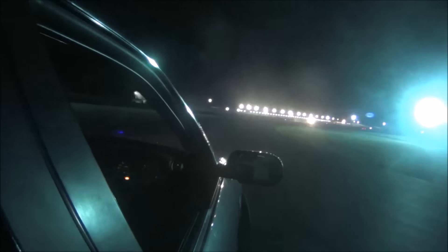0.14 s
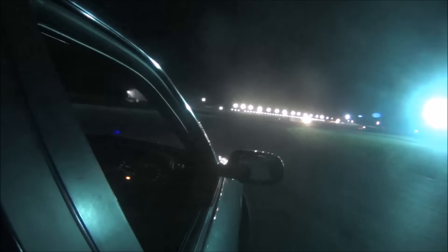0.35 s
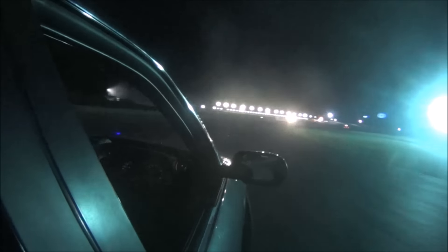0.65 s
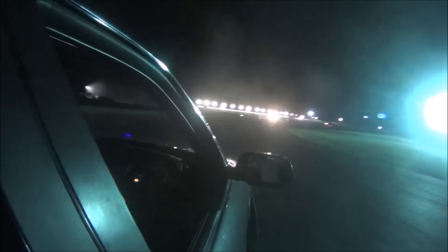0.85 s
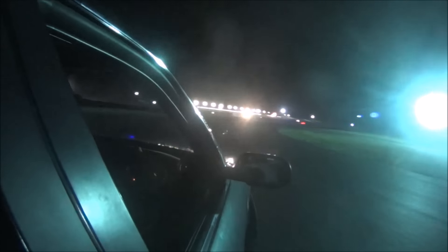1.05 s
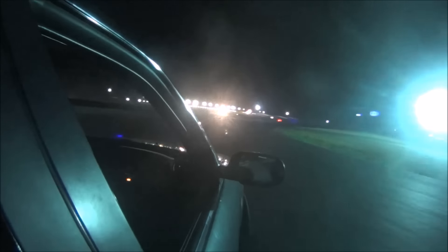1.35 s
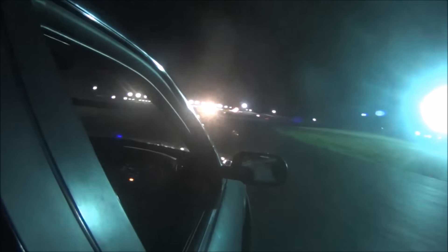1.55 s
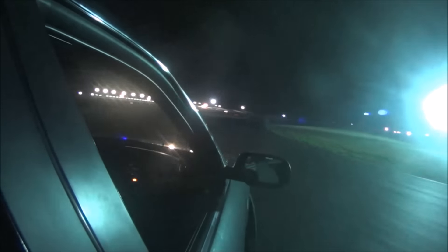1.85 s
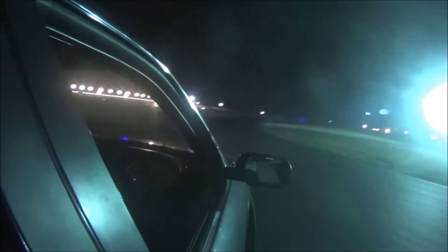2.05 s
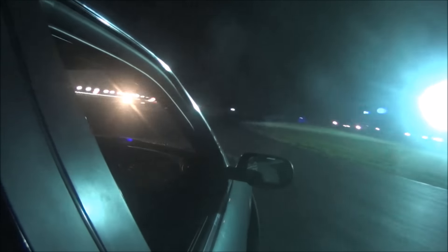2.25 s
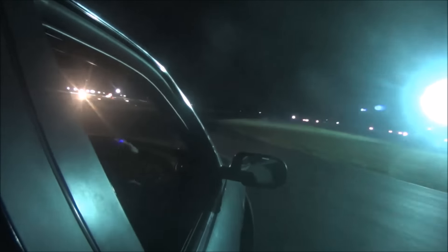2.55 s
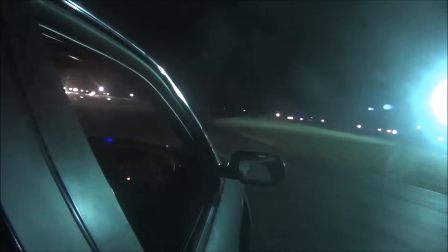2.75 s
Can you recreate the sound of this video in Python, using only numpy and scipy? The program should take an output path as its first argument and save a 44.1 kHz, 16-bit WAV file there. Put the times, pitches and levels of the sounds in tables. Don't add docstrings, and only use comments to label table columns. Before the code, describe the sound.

Car drifting on an open night track: loud limiter-bound exhaust stutters with low pops about eight times a second, over continuous wavering tire squeal and hissing rubber, with wind buffeting a camera microphone fixed to the car.

```python
import sys
import numpy as np
from scipy import signal
from scipy.fft import rfft, irfft
from scipy.io import wavfile
from scipy.ndimage import uniform_filter1d

SR = 44100
rng = np.random.default_rng(int(sys.argv[2]) if len(sys.argv) > 2 else 0)


def master(y):
    cut = np.clip(np.atleast_2d(y).T, -1, 1)
    pcm = np.round(cut * 32767)
    wavfile.write(sys.argv[1], SR, pcm.astype(np.int16))


def linear_from_db(decibels):
    return 10 ** (np.asarray(decibels, float) / 20)


N = 128331


def engine(t):
    mute_db, sag = ignition_cuts(t)
    return drone(t, mute_db, sag) + thumps(t) + 0.79 * pipe_hums(t) + boom(t, mute_db)


# [t/s, length/s, drop level/dB, thump level/dB, thump f/Hz]
CUTS = [(0.149, 0.016, -21, -16.5, 162), (.306, 0.036, -15.5, -16.5, 156), (0.447, 0.0062, -13.5, -24, 168),
        (0.589, 0.022, -25.5, -15.5, 162), (0.726, 0.0059, -14, -21, 204), (.85, 0.027, -7, -22, 126),
        (1.03, 0.067, -4.5, -16.5, 143), (1.211, 0.034, -11.5, -16.5, 145), (1.354, 0.024, -15, -18, 146.3),
        (1.478, 0.027, -12, -19.5, 165), (1.514, 0.011, -8, -29.5, 152), (1.618, 0.015, -14, -17.5, 167),
        (1.712, 0.023, -10, -15.5, 166), (1.81, 0.022, -6, -33, 214), (1.922, 0.021, -14, -23, 141),
        (1.982, 0.032, -10.5, -19, 130), (2.062, 0.035, -13.5, -18.5, 142.4),
        (2.138, 0.025, -7.5, -16, 148), (2.212, 0.023, -17, -15.5, 141), (2.299, 0.016, -5.5, -25.5, 130),
        (2.512, 0.027, -13, -16, 173), (2.576, 0.026, -11, -20, 137.4), (2.724, 0.016, -12.5, -13.5, 200),
        (2.846, 0.028, -19.5, -18, 133)]
REGAIN_S = 0.028


def ignition_cuts(t):
    at, length, drop_db = np.array(CUTS).T[:3, :, None]
    since = t - at
    mute_db = (drop_db * np.exp(-(2 * since / length) ** 2)).sum(0)
    recovery = np.exp(-np.maximum(since - 0.012, 0) / REGAIN_S)
    onset = np.clip(since / 0.04 + 0.85, 0, 1)
    sag = (-drop_db / 15 * recovery * onset).max(0)
    return mute_db, sag


# [multiple of the firing rate, level/dB]
ORDER = [(1 / 3, -22), (2 / 3, -20.5), (1, 0), (2, -21.5)]
# [t/s, level against the drone/dB]
RASP = [(0, -9), (.24, -18), (.3, -10), (.55, -3.5), (.7, -8.5), (.88, -7), (.93, -42), (1.1, -12),
        (2.91, -32)]
FIRING_HZ, SAG_HZ = 362.2, 27
DRONE_DB, REFIRE_DB = -20.5, -4.5


def drone(t, mute_db, sag):
    hz = FIRING_HZ - SAG_HZ * sag + 1.31 * walk(40.22)
    phase = 2 * np.pi * np.cumsum(hz) / SR
    tone = np.zeros(N)
    for k, db in ORDER:
        flutter_db = (0.9 if k == 1 else 3.0) * walk(28.52)
        order_db = db + flutter_db + mute_db * min(k, 1) ** 2 + REFIRE_DB * sag
        tone += linear_from_db(order_db) * np.sin(k * phase + 0.2 * walk(90) * k)
    rasp_db = np.interp(t, *np.array(RASP).T) + mute_db + 4 * np.tanh(walk(41.3))
    tone += linear_from_db(rasp_db) * np.sin(6 * phase + 0.8 * walk(200))
    return np.sqrt(2) * linear_from_db(DRONE_DB) * tone


# [f/Hz, width/Hz, level/dB]
THUMP_PIPE = [(201, 224, -5), (574, 97, -13.5), (705, 118, -10.5)]
THUMP_LATE_S, THUMP_RISE_S, THUMP_FALL_S = 0.00495, 0.006, 0.016
THUMP_GLIDE = 0.592


def thumps(t):
    at, _, _, thump_db, thump_hz = np.array(CUTS).T[:, :, None]
    late = np.maximum(t - at - THUMP_LATE_S, 0)
    fall = np.exp(-late / THUMP_FALL_S)
    flame = linear_from_db(thump_db) * (1 - np.exp(-late / THUMP_RISE_S)) * fall
    turns = thump_hz * (late + THUMP_GLIDE * THUMP_FALL_S * (1 - fall))
    gas = rng.standard_normal(N)
    pipe = sum(level(ring(ring(gas, hz, width), hz, width), db) for hz, width, db in THUMP_PIPE)
    tone = (flame * np.sin(2 * np.pi * turns)).sum(0)
    return 1.98 * (tone + flame.sum(0) * pipe)


# [t/s, length/s, level/dB, f/Hz]
HUMS = [(0.312, 0.091, -17.5, 150), (0.918, 0.098, -17.5, 123), (1.632, .07, -16.5, 161),
        (2.539, 0.043, -24, 145), (2.848, 0.054, -18, 128)]


def pipe_hums(t):
    hums = np.zeros(N)
    for at, length, db, hz in HUMS:
        hums += linear_from_db(db) * np.exp(-(2 * (t - at) / length) ** 4) * np.sin(2 * np.pi * hz * t)
    return hums


# [f/Hz, level/dB per Hz]
BOOM = [(25, -0.5), (60, -0.5), (100, 3.5), (125, 9), (220, 5.5), (300, -3), (450, -4.5), (900, -35.5)]
BOOM_DB, BOOM_GROWS_DB = -24.5, 6


def boom(t, mute_db):
    swell_db = 0.5 * walk(7.0) + 0.083 * mute_db + BOOM_GROWS_DB * t / t[-1]
    return level(rush(BOOM, swell_db, 2.15, 18), BOOM_DB)


def tyres(t):
    unsettled = np.where(t < 0.9, 1.45, 1)
    near_squeal, near_slip, effort_db = near_tyre(t, unsettled)
    far_squeal, far_slip = far_tyre(t, unsettled)
    return 1.327 * (near_squeal + far_squeal) + scrub(t, effort_db, near_slip + far_slip)


# [t/s, squeal level/dB, overtone level/dB, scrub level/dB]
SLIDE = [(0, -25, -1.5, 3.5), (.1, -24, -4, 1), (.2, -18, -10.5, 3), (.27, -25, -3.5, 3),
         (.47, -23, -6, 2.5), (.54, -28, -11, -1), (.61, -18.5, -13, 2), (.8, -25.5, 2.5, 1),
         (0.931, -18, -15, 2), (1.05, -17.5, -14, 0.5), (1.3, -18.5, -12, 0.5), (1.53, -21, -8, -1.5),
         (1.8, -18, -8.5, 0), (2.1, -17.5, -9.5, -1.5), (2.26, -20, -19, 1), (2.4, -18, -17, 2),
         (2.56, -23.5, -9.5, 2.5), (2.91, -17.5, -9, -1)]
# [t/s, squeal f/Hz, warble per wheel turn/Hz]
PITCH = [(0, 945, 5), (.21, 962, 5), (.27, 1005, 10), (.4, 1000, 15), (.47, 945, 5), (.61, 935, 10),
         (.69, 985, 20), (.76, 930, 10), (.97, 975, 15), (1.06, 940, 30), (1.66, 960, 25), (1.74, 922, 36),
         (2.13, 960, 48), (2.23, 895, 28), (2.285, 975, 30), (2.33, 932, 6), (2.5, 892, 14),
         (2.91, 905, 24)]
WHEEL_HZ, WARBLE_TOP_S = 13.9, 1.195
WHEEL_DIP_DB = 0.8


def near_tyre(t, unsettled):
    at, *effort = np.array(SLIDE).T
    db, over_db, effort_db = (np.interp(t, at, v) for v in effort)
    at, *pitch = np.array(PITCH).T
    hz, warble_hz = (np.interp(t, at, v) for v in pitch)
    turn = 2 * np.pi * WHEEL_HZ * (t - WARBLE_TOP_S)
    hz = hz + warble_hz * (np.cos(turn) + 0.42 * np.sin(2 * turn))
    db = db + WHEEL_DIP_DB * np.cos(turn + 0.5)
    squeal, slip = stick_slip(hz, db, over_db, 0.012 * unsettled)
    return squeal, slip, effort_db


# [t/s, squeal f/Hz, squeal level/dB, overtone level/dB]
FAR_SLIDE = [(0, 1130, -21.5, -9), (0.152, 1097, -23, -17), (0.25, 1066, -21, -7),
             (0.402, 1045, -22.5, -20), (.52, 1065, -19, -15), (.6, 1033, -24.5, -12), (.7, 1025, -23, -8),
             (0.841, 1080, -20, -13), (.95, 1062, -30.5, -44), (1.4, 1032, -24, -22), (1.6, 1050, -31, -7),
             (2.221, 1048, -34, -19), (2.28, 1005, -16, -10), (2.35, 1038, -34, -16),
             (2.91, 1030, -29.5, -5)]
EDGE_RATIO, EDGE_DB = 1.11, -5


def far_tyre(t, unsettled):
    at, *far = np.array(FAR_SLIDE).T
    hz, db, over_db = (np.interp(t, at, v) for v in far)
    squeal, slip = stick_slip(hz, db, over_db, 0.016 * unsettled)
    edge_squeal, edge_slip = stick_slip(hz * EDGE_RATIO, db + EDGE_DB, over_db - 20, 0.03 * unsettled)
    return squeal + edge_squeal, slip + edge_slip


def stick_slip(hz, db, over_db, ragged):
    phase = 2 * np.pi * np.cumsum(hz * (1 + 0.003 * walk(30) + ragged * walk(160))) / SR
    grip = linear_from_db(db + 1.0 * np.tanh(walk(45.08)) + 3.2 * np.tanh(walk(130)))
    octave = linear_from_db(over_db + 8.3 * np.tanh(walk(48.96))) * np.sin(2 * phase + 0.75 * walk(200))
    return grip * (np.sin(phase) + octave), grip * np.cos(phase)


# [f/Hz, level/dB per Hz]
SCRUB = [(650, -50), (1100, -7.5), (1470, -10), (2130, -10), (3200, -21), (3670, -31), (5200, -33),
         (8450, -52.5), (11200, -53.5), (14600, -91), (22000, -120)]
# [t/s, level/dB]
SCRAPES = [(.23, 4), (.43, 4), (.57, 6), (.725, 6), (1.04, 3), (1.18, 0), (1.7, 4), (1.86, 2.5), (2.05, -5),
           (2.13, 3), (2.259, 4.5), (2.345, 0), (2.4, 4), (2.54, 2), (2.65, 3.5), (2.73, 4.5)]
SCRUB_DB, SCRUB_FOOT_HZ, SCRUB_GROWS_DB = -20.5, 951, 2.5
SCRAPE_S = 0.014


def scrub(t, effort_db, slip):
    foot = [(400, -45), (SCRUB_FOOT_HZ * 0.74, -24), (SCRUB_FOOT_HZ, -2)]
    swell_db = 0.5 * walk(21.1) + SCRUB_GROWS_DB * t / t[-1]
    hiss = rush(foot + list(SCRUB)[1:9], swell_db, 1.34, 44.97)
    grit = signal.sosfilt(signal.butter(2, 2600, "high", fs=SR, output="sos"), hiss)
    lift_db = effort_db + 0.25 * walk(34.87) + 0.91 * walk(80) + 1.23 * walk(400)
    hiss = hiss + grit * (linear_from_db(lift_db) * (2 + 0.36 * level(slip, 0)) - 1)
    catch_db = sum(db * np.exp(-(2 * (t - at) / SCRAPE_S) ** 2) for at, db in SCRAPES)
    return level(hiss * linear_from_db(catch_db), SCRUB_DB)


# [f/Hz, level/dB per Hz]
WIND = [(25, -8), (150, 8), (300, -8), (600, -4), (1100, 3.5), (2000, -2), (3500, -13.5), (11000, -36)]
WIND_DB = -25


def wind():
    gust_db = 2.6 * walk(44.8)
    return [level(rush(WIND, gust_db, 0.81, 16), WIND_DB) for _ in range(2)]


# [f/Hz, level/dB, lead/rad]
PORTS = [(40, -3, 0.011), (130, -1, 0.58), (350, -4.5, 1.43), (930, 2.5, -0.4), (1130, -6.5, -0.41),
         (2020, 1, 1.5), (2130, 3, 0.57), (5130, 0, 0.38)]


def ports(car):
    half = linear_from_db(over_hz(PORTS) / 2) * np.exp(0.5j * over_hz(PORTS, column=2))
    spectrum = rfft(car)
    return np.array([irfft(spectrum * half, N), irfft(spectrum / half, N)])


def level(x, db):
    return x * linear_from_db(db) / np.sqrt(np.mean(x ** 2))


def over_hz(table, column=1):
    table = np.array(table, float)
    hz = np.arange(N // 2 + 1) * SR / N
    return np.interp(np.log(hz + 1), np.log(table[:, 0]), table[:, column])


def walk(rate):
    k = max(int(SR / rate), 2)
    steps = np.repeat(rng.standard_normal(8000), k)[:N + k]
    smooth = uniform_filter1d(uniform_filter1d(steps, k), k)[:N]
    return smooth / smooth.std()


def ring(x, hz, width_hz):
    return signal.lfilter(*signal.iirpeak(hz, hz / width_hz, SR), x)


def rush(table, swell_db, flicker_db, rate):
    spectrum = rfft(rng.standard_normal(N)) * linear_from_db(over_hz(table))
    octave = np.log2(np.arange(N // 2 + 1) * SR / N / 16 + 1e-9)
    total = np.zeros(N)
    for k in range(11):
        band = irfft(spectrum * np.clip(1 - abs(octave - k), 0, 1), N)
        total += band * linear_from_db(swell_db + flicker_db * walk(rate))
    return total


def scene():
    t = np.arange(N) / SR
    return ports(engine(t) + tyres(t)) + wind()


def roll_off(x):
    return signal.sosfilt(signal.butter(12, 11340, fs=SR, output="sos"), x)


# [f/Hz, width/Hz, level/dB]
CASE = [(1346, 33, 5), (1484, 85, -1.5), (1577, 31, 5), (1828, 79, -8.5), (1960, 130, 2), (3700, 390, -0.5),
        (10560, 1900, 5.5)]
TOP_HZ = 11200


def record(dry):
    for hz, width_hz, db in CASE:
        dry = dry + (linear_from_db(db) - 1) * ring(dry, hz, width_hz)
    power = uniform_filter1d((dry ** 2).mean(0), int(0.023 * SR))
    gain = (power / power.mean() + 0.017) ** -0.15
    dry = np.tanh(0.84 * dry * gain) / 0.77
    mix = signal.sosfilt(signal.ellip(12, 0.3, 80, TOP_HZ, fs=SR, output="sos"), dry)
    return roll_off(mix)


dry = scene()
out = record(dry)
master(out)
```